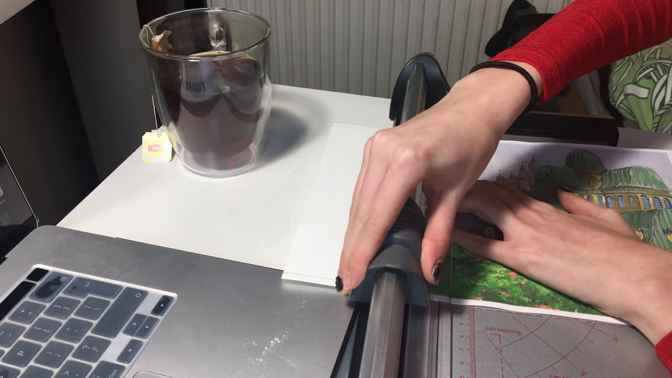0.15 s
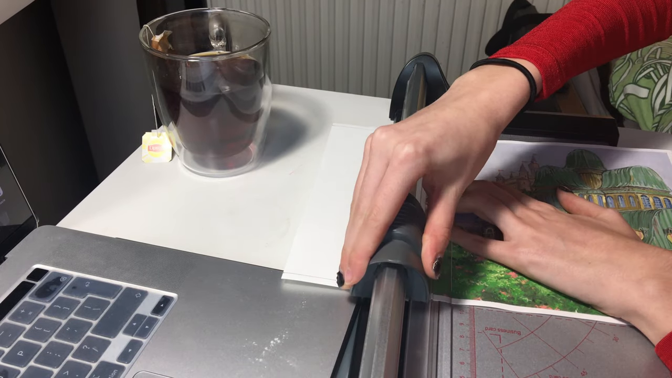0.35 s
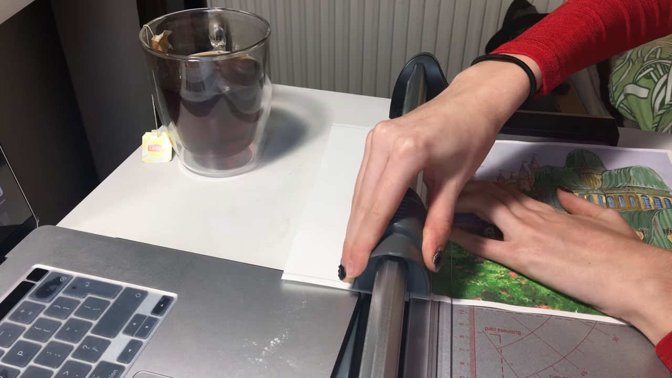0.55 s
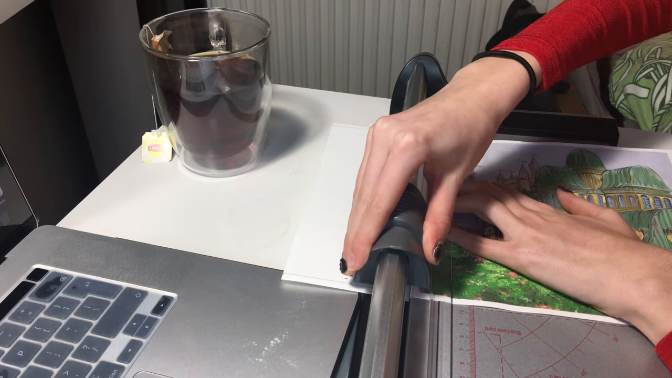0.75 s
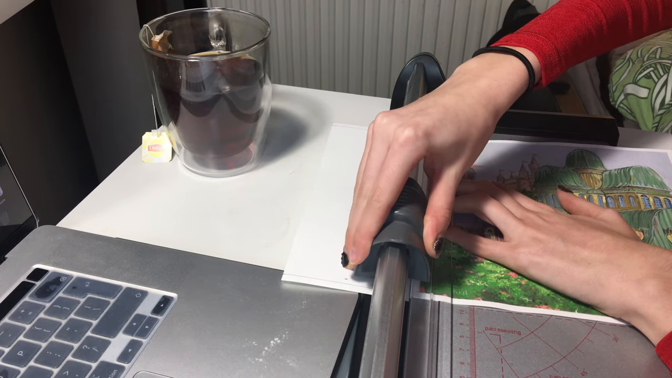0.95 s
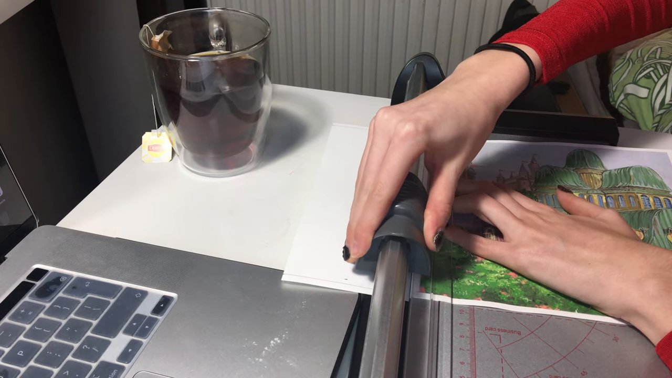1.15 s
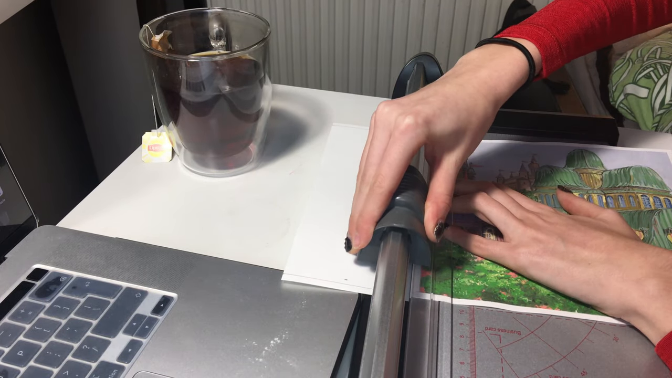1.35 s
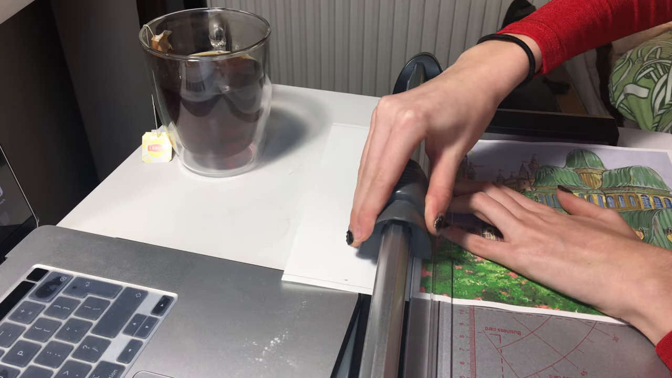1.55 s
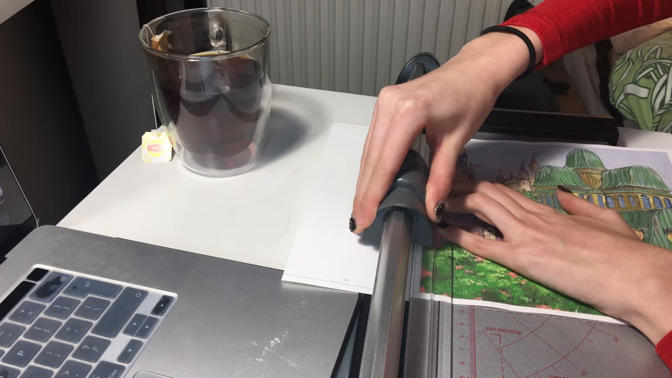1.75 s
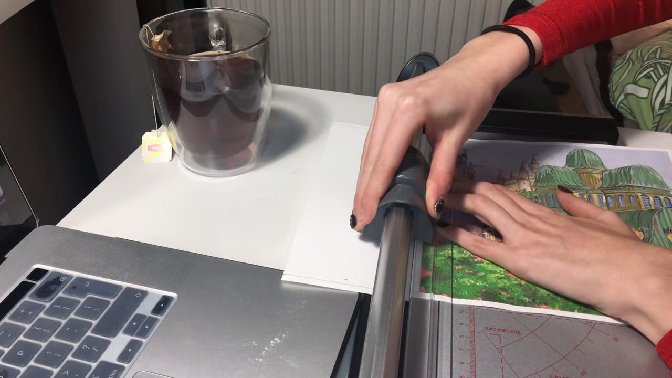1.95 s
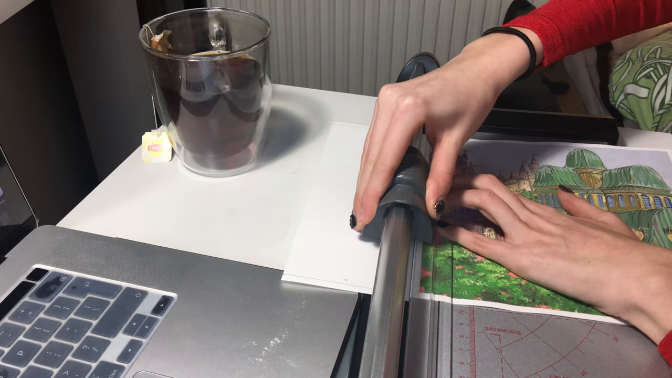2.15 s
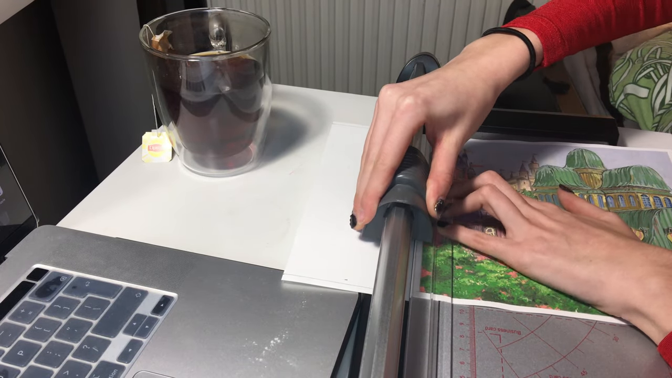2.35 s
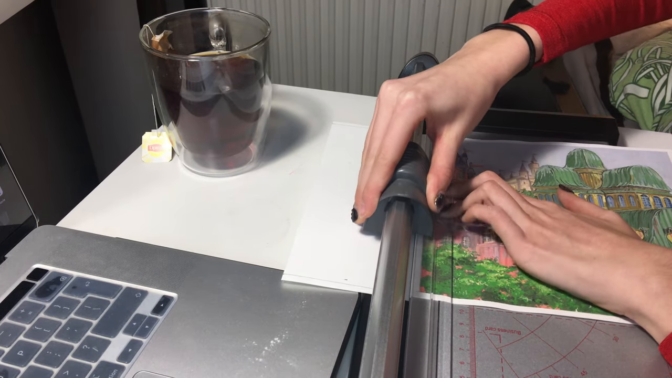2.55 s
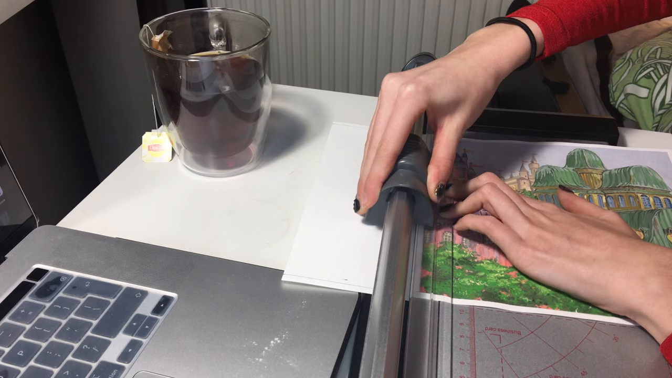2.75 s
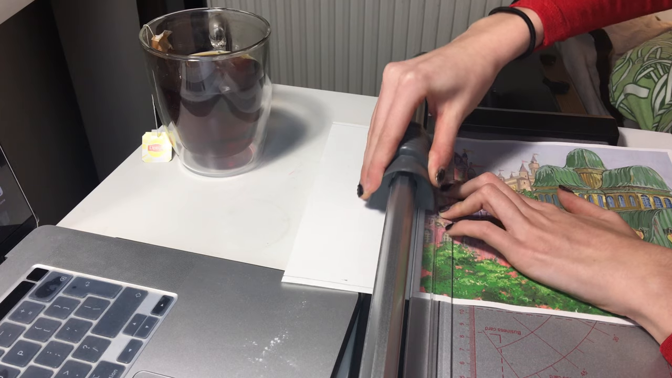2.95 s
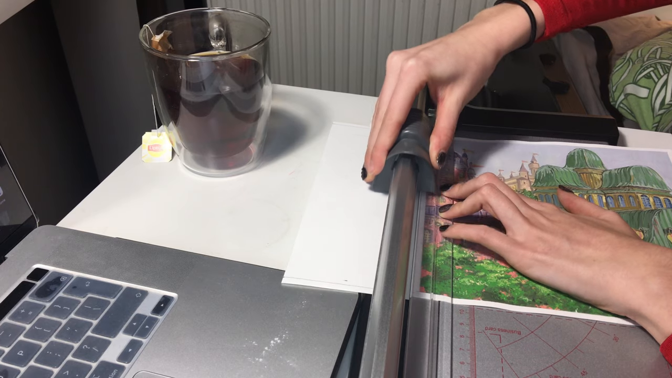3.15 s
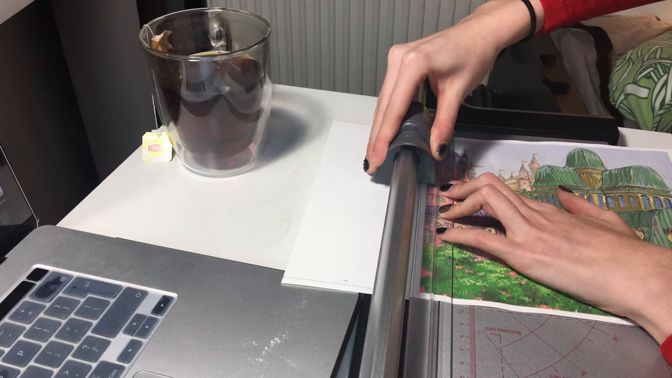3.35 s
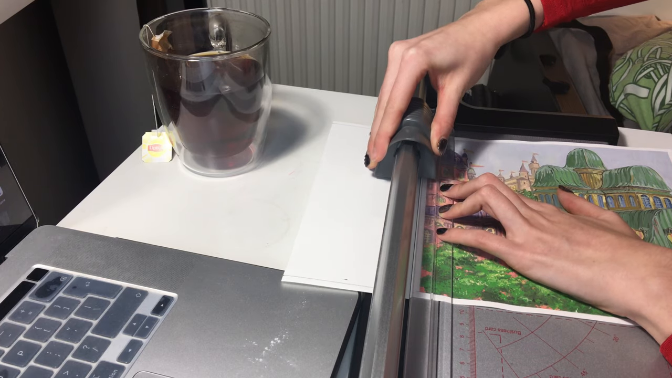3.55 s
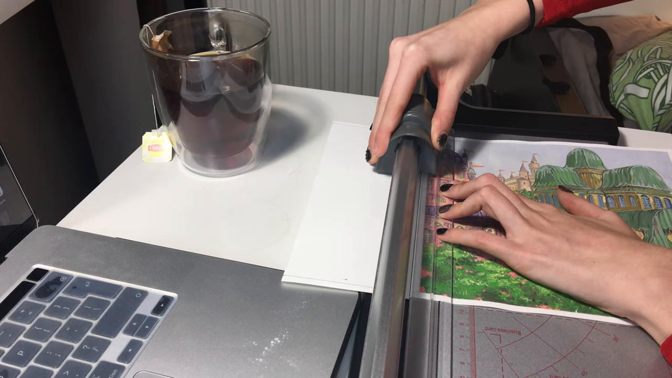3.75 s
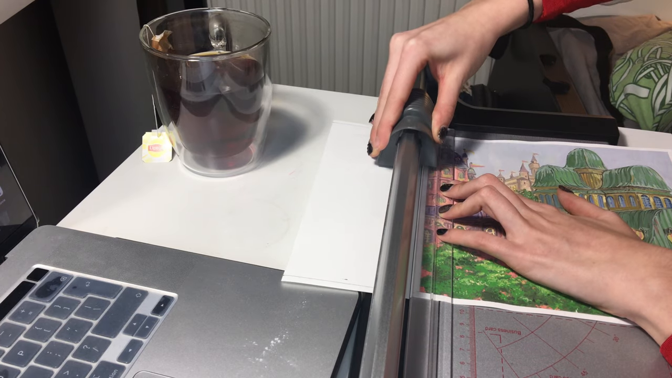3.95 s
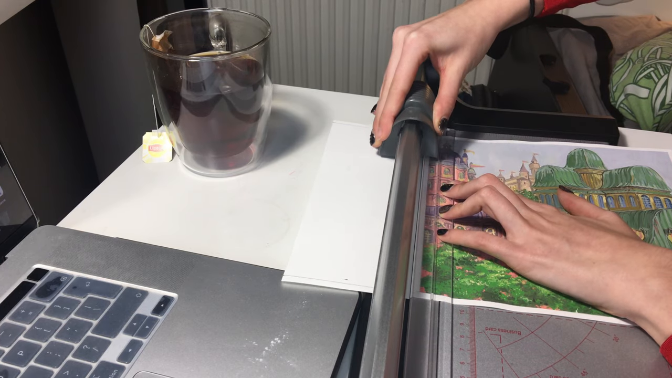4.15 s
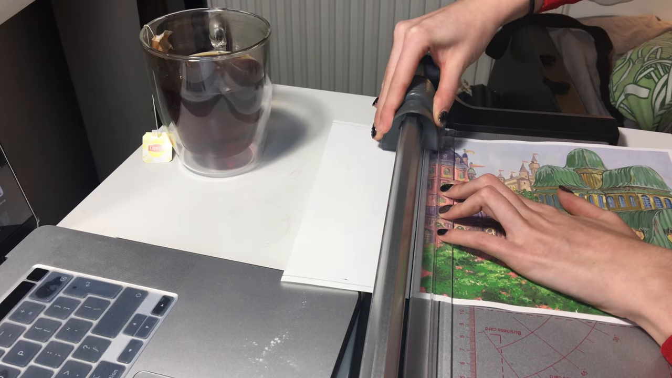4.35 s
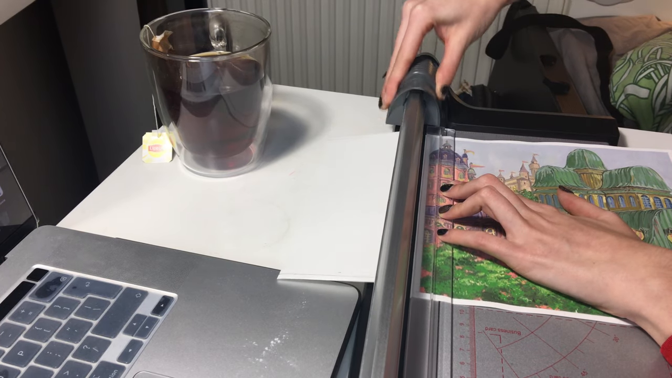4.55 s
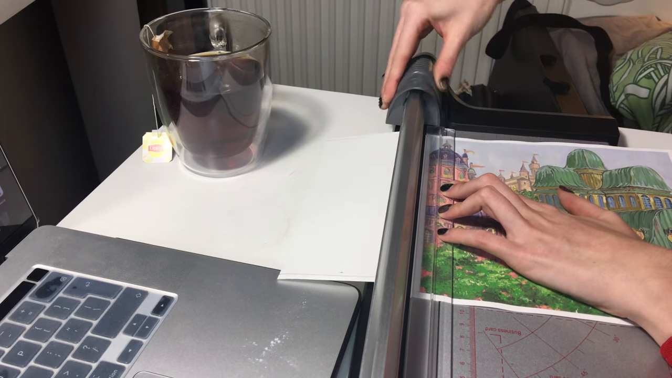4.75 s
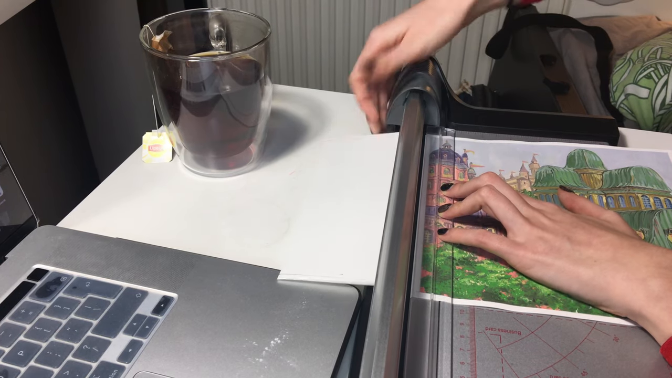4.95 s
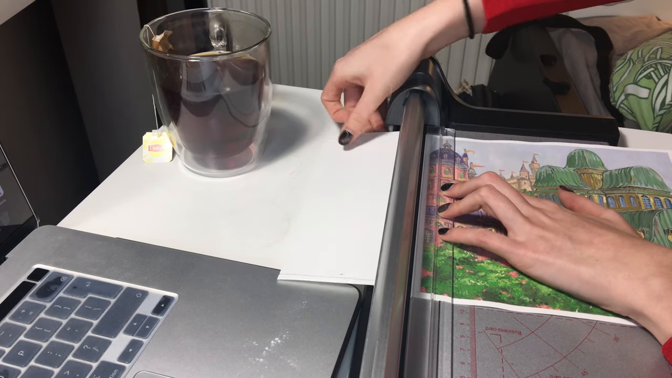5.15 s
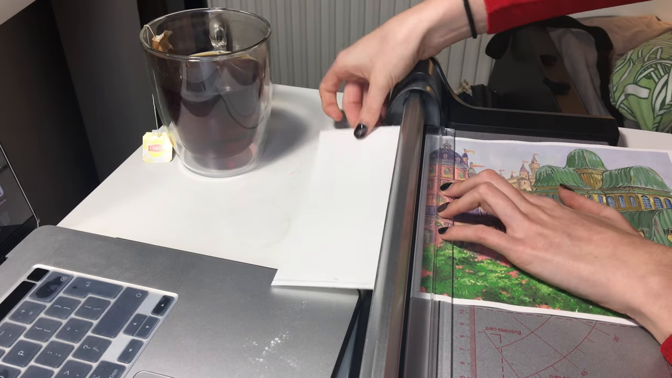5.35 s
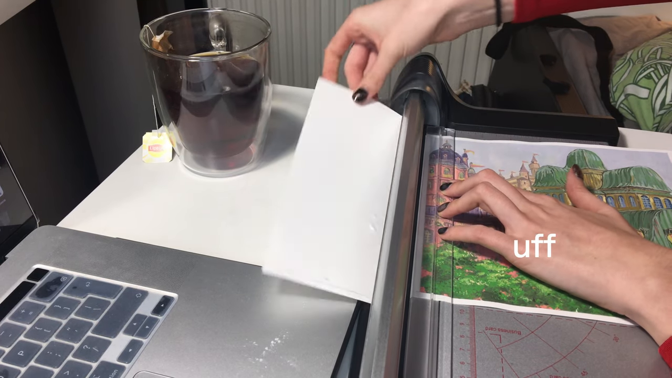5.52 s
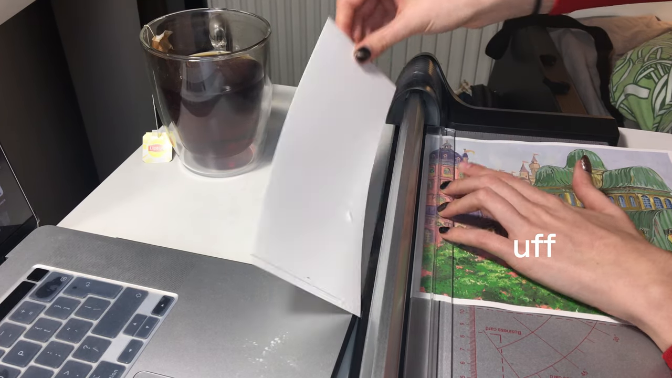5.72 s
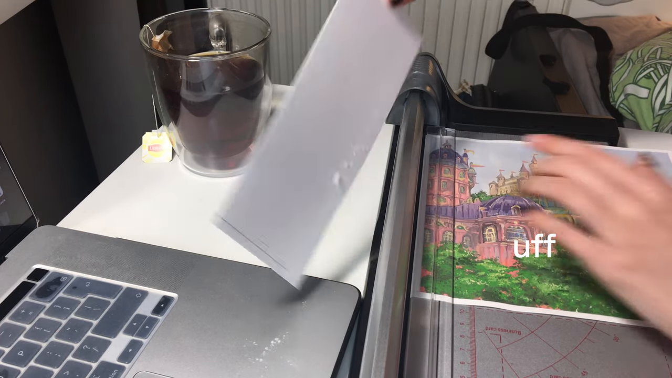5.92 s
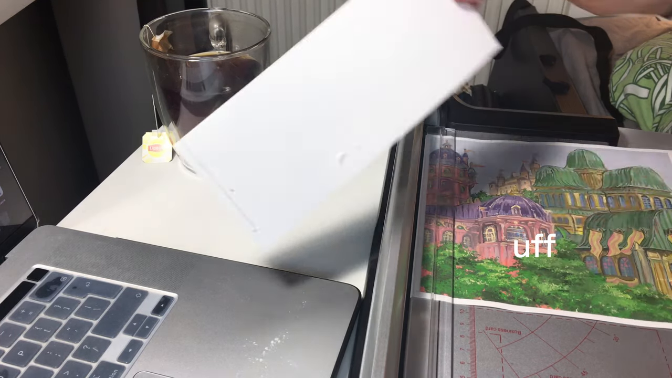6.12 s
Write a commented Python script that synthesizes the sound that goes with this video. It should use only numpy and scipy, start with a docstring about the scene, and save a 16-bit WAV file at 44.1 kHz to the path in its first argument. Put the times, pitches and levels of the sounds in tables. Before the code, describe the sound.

Stick-slip plastic and metal scraping with a fine hiss of cutting paper comes in two strokes of about two seconds, separated by a short gap. The second ends in loud, sharp clacks with a woody thump. Then come quiet finger taps, brief paper rubs and a papery snap with a soft whoosh. Close, dry pickup with short room reflections and faint room air.

```python
"""A desk in a small room: the blade carriage of a rail trimmer is pushed through a sheet of paper in two strokes.
Stick-slip friction and tearing fibres, as random impulses over a hiss, make the rail and its plastic base ring.
The carriage clacks against the end stop: each blow is a burst of contact noise over decaying low modes.
Then fingers let go, slide the cut strip off the desk and lift it, and it snaps free: rubbed noise, a gliding
air resonance and light blows. Still room air lies beneath."""
import sys
import numpy as np
from scipy import signal
from scipy.fft import rfft, irfft
from scipy.io import wavfile

SR = 44100
rng = np.random.default_rng(int(sys.argv[2]) if len(sys.argv) > 2 else 0)


def put_to_file(sound):
    """Save the sound as 16-bit audio at rate SR, in the file named by the first command-line argument."""
    columns = np.atleast_2d(sound).T  # one column per channel
    safe = np.clip(columns, -1, 1)
    whole_steps = np.round(safe * 32767)
    wavfile.write(sys.argv[1], SR, whole_steps.astype(np.int16))


N = 276948
TIME = np.arange(N) / SR  # s
BINS_HZ = np.fft.rfftfreq(16384, 1 / SR)


def amp(db):
    """Level law: decibels to amplitude gain."""
    return 10 ** (np.asarray(db) / 20)


def unit(x):
    """Normalisation: scales a signal to an rms of one."""
    return x / np.sqrt(np.mean(x ** 2) + 1e-20)


def read(points, hz=BINS_HZ):
    """Spectral interpolation: reads a table on a logarithmic frequency axis."""
    f, value = np.transpose(points)
    return np.interp(np.log(hz + 1), np.log(f + 1), value)


def add(mix, s, sound):
    """Superposition: adds a sound to the mix from a given time in s."""
    part = mix[round(s * SR):][:len(sound)]
    part += sound[:len(part)]


def colour(x, db):
    """Minimum-phase filtering: the gain fixes a causal response, so its peaks ring after each impulse."""
    log_gain = np.log(amp(np.r_[db, db[-2:0:-1]]))  # mirrored to negative frequencies
    spectrum = np.exp(np.conj(signal.hilbert(log_gain)))
    response = np.fft.ifft(spectrum).real
    return signal.fftconvolve(x, response[:len(db)])[:len(x)]


def band(x, lo_hz, hi_hz):
    """Band-pass filtering: keeps one frequency band, at an rms of one."""
    hz = np.fft.rfftfreq(len(x), 1 / SR) + 1
    gain = 1 / np.sqrt((1 + (lo_hz / hz) ** 12) * (1 + (hz / hi_hz) ** 12))
    return unit(irfft(rfft(x) * gain, len(x)))


def level(s, db):
    """Level contour: interpolates gain in dB, and is practically silent outside its times."""
    return amp(np.interp(TIME, s, db, left=-140, right=-140))


def gesture(start, length, attack_s, t60):
    """Envelope: a straight rise, a hold to the end of its length, and an exponential decay."""
    t = TIME - start
    return np.clip(t / attack_s, 0, 1) * amp(-60 * np.maximum(t - length, 0) / t60)


def slips(per_s, spread_db, hiss):
    """Stick-slip friction: random impulses of uneven size and either sign over a smooth hiss."""
    size = amp(spread_db * np.minimum(rng.exponential(1, N), 4))
    sign = rng.choice([-1, 1], N)
    slipping = rng.random(N) < per_s / SR
    return unit(unit(size * sign * slipping) + hiss * rng.standard_normal(N))


# spectral shape of the still room air: (f/Hz, relative level/dB per Hz)
AIR_SPECTRUM = [(15, -40.5), (25, -7), (70, 1), (180, -2.5), (354, -8), (463, -11), (2760, -20),
                (4250, -20.5), (4870, -25.5), (6210, -21.5), (10400, -27.5), (13200, -27.5), (16000, -35)]
AIR_DB = -63.5


def room_air():
    """Steady noise: a random signal shaped by the spectrum of still room air."""
    return amp(AIR_DB) * unit(colour(rng.standard_normal(N), read(AIR_SPECTRUM)))


# hands shifting on the base: (start t/s, length t/s, level/dB)
HAND_SHIFTS = [(2.056, 0.23, -63.5), (4.791, .14, -62), (4.99, 0.038, -51), (5.378, 0.13, -62),
               (5.84, 0.077, -65)]
SHIFT_ATTACK_S, SHIFT_T60_S = 0.013, 0.65


def hand_shifts():
    """Friction noise through a resonant body: a dull stir, coloured by the rail's near end."""
    stir = band(colour(rng.standard_normal(N), read(NEAR_COLOUR) + rail_db(0)), 40, 520)
    shifting = sum(amp(db) * gesture(start, length, SHIFT_ATTACK_S, SHIFT_T60_S)
                   for start, length, db in HAND_SHIFTS)
    return stir * shifting


# decay time of the room: (f/Hz, t60/s)
ROOM_DECAY = [(100, 0.064), (500, 0.16), (2000, 0.19), (6000, 0.18), (16000, 0.16)]


def room(x, wet_db=-15, build_s=0.0054):
    """Diffuse reverberation: a tail that builds quickly, dies fastest in the bass and lasts longest around 2 kHz."""
    hz, t, noise = signal.stft(rng.standard_normal(SR // 2), SR, nperseg=256)
    decay = amp(-60 * t / read(ROOM_DECAY, hz)[:, None])
    build = 1 - np.exp(-t / build_s)
    tail = signal.istft(noise * decay * build, SR)[1]
    return x + amp(wet_db) * signal.fftconvolve(x, tail / np.linalg.norm(tail))[:N]


# spectral shape of paper rubbing on the desk: (f/Hz, relative level/dB per Hz)
PAPER_SPECTRUM = [(200, -6), (700, 0.5), (2000, 5), (4000, -8.5), (8000, -7.5), (16000, -14)]
# short slides of the strip over the desk: (start t/s, length t/s, rub level/dB, fizz level/dB)
STRIP_SLIDES = [(5.09, .1, -67, -82), (5.203, 0.024, -54.5, -57), (5.302, 0.054, -72.5, -62),
                (5.458, .03, -62, -73), (5.508, 0.069, -55, -59), (5.595, 0.021, -64, -50),
                (5.663, 0.02, -59, -64)]
SLIDE_ATTACK_S, RUB_T60_S, FIZZ_T60_S = 0.02, 0.39, .16


def strip_slides(catch_db=1.5):
    """Sliding friction: the strip rubs over the desk, and uneven catching modulates the noise."""
    catching = amp(catch_db * band(rng.standard_normal(N), 6.8, 52))
    grain = colour(slips(600, 2.4, 1.0), read(PAPER_SPECTRUM)) * catching
    rub = sum(amp(db) * gesture(start, length, SLIDE_ATTACK_S, RUB_T60_S)
              for start, length, db, _ in STRIP_SLIDES)
    fizz = sum(amp(db) * gesture(start, length, SLIDE_ATTACK_S, FIZZ_T60_S)
               for start, length, _, db in STRIP_SLIDES)
    return band(grain, 430, 5200) * rub + band(grain, 3600, 17000) * fizz


LIFT_S, LIFT_DB, LIFT_ATTACK_S, LIFT_T60_S = 5.683, -51.5, 0.01, 0.33
GAP_SHUT_HZ, GAP_OPEN_HZ, GAP_OPENING_S = 975, 190, 0.022  # the last is a time constant


def strip_lift(pole_width_hz=560):
    """Air-gap resonance: noise under the lifting strip sinks in pitch as the gap opens."""
    opening_s = np.maximum(TIME - LIFT_S - LIFT_ATTACK_S, 0)
    hz = GAP_OPEN_HZ + (GAP_SHUT_HZ - GAP_OPEN_HZ) * np.exp(-opening_s / GAP_OPENING_S)
    carrier = np.exp(2j * np.pi * np.cumsum(hz) / SR)
    r = np.exp(-np.pi * pole_width_hz / SR)  # two equal poles smooth the noise that rides on the carrier
    smooth = signal.lfilter([1], [1, -2 * r, r * r], rng.standard_normal(N))
    air = (carrier * smooth).real
    return amp(LIFT_DB) * unit(air) * gesture(LIFT_S, LIFT_ATTACK_S, LIFT_ATTACK_S, LIFT_T60_S)


def blows(rows, spectrum_db, modes, ring_db, ring_s, swell_s):
    """Impact excitation: a brief chatter of contact with a short ring, and low modes set swinging."""
    out, t = np.zeros(N), np.arange(SR // 2) / SR
    swing = sum(amp(db - 60 * t / t60) * np.sin(2 * np.pi * hz * t) for hz, db, t60 in modes)
    thump = swing * (1 - np.exp(-t / swell_s))
    octaves = np.log2(1 + (BINS_HZ / 1500) ** 2) / 2  # the tilt sets in around 1500 Hz
    for s, crack_db, decay, tilt_db, thump_db in rows:
        envelope = np.exp(-t / decay) + amp(ring_db) * np.exp(-t / ring_s)
        chatter = rng.choice([-1, 1], len(t)) * envelope
        chatter *= 1 - np.exp(-t / .0004)  # the contact takes a moment to close
        crack = colour(chatter, spectrum_db + tilt_db * octaves)
        crack /= np.sqrt(np.mean(crack[:SR // 250] ** 2))  # rms of one over the first 4 ms
        add(out, s, amp(crack_db) * crack + amp(thump_db) * thump)
    return out


# fingers and nails tapping the strip, and the strip snapping:
# (t/s, crack level/dB, contact decay constant t/s, treble tilt/dB per octave, flap level of the sheet/dB)
STRIP_BLOWS = [(5.0165, -41.5, .005, -9, -37), (5.025, -42.5, 0.0067, -29, -47),
               (5.051, -46, .0034, -3, -64), (5.077, -55, 0.0042, 3, -70), (5.139, -62, .003, 5, -56),
               (5.435, -42.5, 0.0016, 13, -48), (5.499, -53, .002, -6, -52), (5.808, -33.5, 0.012, 5, -56),
               (5.811, -37.5, 0.0056, 4, -61), (5.8495, -39, 0.0091, 5, -48.5),
               (5.871, -48.5, 0.014, -15, -45), (5.880, -55, .005, -4.5, -46), (5.910, -58, 0.0034, 1, -55)]
# spectral shape of the cracks on paper: (f/Hz, relative level/dB per Hz)
SNAP_SPECTRUM = [(40, -27), (150, -3), (400, -3), (700, -4), (900, 7), (1600, 9), (2100, 7), (2800, 5),
                 (4000, 5), (6000, -9.5), (9000, -16), (12000, -23), (16000, -36)]
# flexing modes of the strip: (f/Hz, relative level/dB, t60/s)
SHEET_MODES = [(69.4, -1.5, 0.16), (105, -20, 0.3), (155, 2, 0.11), (274, -8, 0.11), (380, -5, 0.059),
               (713, 10.5, 0.016)]


def strip_snaps():
    """Impact on a light sheet: taps and snaps crack, and the strip flexes in its modes."""
    return blows(STRIP_BLOWS, read(SNAP_SPECTRUM), SHEET_MODES, ring_db=-25, ring_s=0.064, swell_s=0.0023)


REBOUND_CRACK_DB, REBOUND_TILT_DB, REBOUND_THUMP_DB = -13, -5.5, -0.5  # relative to the blow; tilt per octave


def with_rebounds(rows):
    """Rebound: each blow is followed by one weaker and duller blow of the loose carriage."""
    out = []
    for s, crack_db, decay, tilt_db, thump_db, after_s in rows:
        out.append((s, crack_db, decay, tilt_db, thump_db))
        out.append((s + after_s, crack_db + REBOUND_CRACK_DB, decay,
                    tilt_db + REBOUND_TILT_DB, thump_db + REBOUND_THUMP_DB))
    return out


# blows on the trimmer: (t/s, crack level/dB, contact decay constant t/s, treble tilt/dB per octave,
# thump level of the base/dB, delay of the rebound t/s)
TRIMMER_BLOWS = [(2.044, -58, 0.0027, 0, -82, .03), (2.116, -55, 0.0055, -10, -69, .012),
                 (2.1793, -39, .0036, -2, -52, .012), (2.272, -53.5, 0.019, -59, -60, .012),
                 (4.4545, -21, 0.0018, 1.5, -38, .0065), (4.4833, -9, 0.0043, -2.5, -21, 0.0047),
                 (4.5482, -19.5, .0041, -1, -35, .006), (4.572, -12, 0.0019, 0.5, -31.5, .012),
                 (4.657, -36, .0054, -11, -48, .019), (4.7858, -49, .003, -2.5, -55, .012),
                 (4.8155, -59, 0.0095, -29, -44.5, .0125), (4.897, -60.5, 0.0033, -2, -58, .018),
                 (4.984, -53, .004, 0, -64, 0.0087), (4.9888, -38, 0.011, 3, -55, .008)]
# spectral shape of the cracks, before the rail's resonances: (f/Hz, relative level/dB per Hz)
CRACK_SPECTRUM = [(40, -35), (150, -20.5), (400, -23.5), (700, -7), (1200, 2), (1700, 5), (2200, 2.5),
                  (2900, 1.5), (4000, -2.5), (6000, -6), (8000, -9), (12000, -18.5), (16000, -19.5)]
# modes of the base thumping on the desk: (f/Hz, relative level/dB, t60/s)
BASE_MODES = [(66.6, -17, 0.5), (120, -8.5, 0.17), (159, 3, 0.15), (210, 5.5, 0.08), (247, -5, 0.18),
              (325, -26.5, 0.063), (665, -15, 0.096), (1394, -17.5, 0.085), (1771, -22, 0.12)]


def trimmer_knocks():
    """Impact on a resonant body: blows ring the far part of the rail and thump the base."""
    spectrum_db = read(CRACK_SPECTRUM) + 0.51 * rail_db(0.91)
    return blows(with_rebounds(TRIMMER_BLOWS), spectrum_db, BASE_MODES,
                 ring_db=-23.0, ring_s=.014, swell_s=0.0015)


# resonances of rail and base:
# (f/Hz, width f/Hz, lift level/dB, extra lift at the antinode level/dB, antinode place along the rail 0-1)
RAIL_MODES = [(170.2, 14.3, 18.5, 2.5, 0.3), (208.8, 20, 5.5, 9.5, 0.89), (316, 52, 6.5, 2.5, 0.4),
              (460, 8.2, -1, 8, .3), (649.4, 40, 15.5, 7.5, 0.17), (855, 21, 14, 12, 0.73),
              (898, 78, 8.5, 9.5, 0.8), (883, 83, 5.5, 11, 0), (1238, 52, 9, 2, .3),
              (1390, 51, 10.5, 6, 0.26), (1455, 120, 7.5, 5.5, 0.5), (1546, 60, 6, 6, 1),
              (1726, 43, -2.5, 20, 0.99), (1920, 99, -10.5, 13.5, 0.1), (2070, 120, 2.5, 10, 0.23),
              (2210, 110, 10, 2.5, 0.6), (2300, 52, 4, 11, 0.1), (2596, 45, -5.5, 1.5, .5),
              (2850, 61, 2.5, 12, 0.31), (3094, 39, 2, 11.5, 1), (3340, 530, 1, 9, 0.67),
              (3740, 100, -3, 13.5, 0.22), (4510, 110, -2.5, 12, .3), (5210, 150, 2.5, 4.5, .25),
              (5485, 200, 5, 3.5, .45), (6030, 180, 2, 6.5, 0.4), (6470, 180, 1.5, -3.5, 0.4),
              (8790, 230, 0, 10.5, 0.2), (9580, 270, 3.5, 4.5, .85), (11480, 540, 6.5, 3.5, 0.7)]


def rail_db(place, reach=0.19):
    """Modal coupling: the lift of each resonance depends on how near the carriage is to its antinode."""
    power = 1
    for hz, width, lift_db, extra_db, antinode in RAIL_MODES:
        nearness = np.exp(-((place - antinode) / reach) ** 2)
        peak = amp(abs(lift_db + extra_db * nearness))  # always a peak, never a dip
        power = power + (peak ** 2 - 1) / (1 + (2 * (BINS_HZ - hz) / width) ** 2) ** 1.5
    return 10 * np.log10(power)


def shell(x, ring_db=-4, t60=0.084):
    """High modal density: many weak modes of rail and housing add a short dense ring."""
    t = np.arange(SR // 5) / SR
    ring = band(rng.standard_normal(len(t)), 1500, 17000) * amp(-60 * t / t60)
    return x + amp(ring_db) * signal.oaconvolve(x, ring / np.linalg.norm(ring))[:len(x)]


# friction colour with the carriage at the near part of the rail: (f/Hz, relative level/dB per Hz)
NEAR_COLOUR = [(25, -33), (65, -4.5), (120, -13.5), (240, -5), (400, -10.5), (520, -13), (760, -24.5),
               (1000, -4.5), (2200, -12.5), (2600, -11.5), (4800, -18.5), (6500, -20.5), (9000, -21.5),
               (10500, -27.5), (15500, -32)]
# the same at the far part: (f/Hz, relative level/dB per Hz)
FAR_COLOUR = [(25, -34.5), (65, -6.5), (120, -9), (245, -4.5), (400, -10), (520, -16), (760, -13),
              (1100, -9), (1800, -9.5), (2600, -8.5), (4000, -17), (4800, -18), (5800, -15.5),
              (8000, -23.5), (10500, -26.5), (15500, -28.5)]
# how far the carriage has come: (t/s, share of the rail 0-1)
CARRIAGE_TRAVEL = [(0, 0.09), (1.9, 0.41), (2.45, 0.34), (3.2, 0.7), (4.48, 0.98)]


def rail(drive, count=9):
    """Moving excitation: friction enters the rail where the carriage is, so its colour drifts."""
    travel, out = np.interp(TIME, *np.transpose(CARRIAGE_TRAVEL)), np.zeros(N)
    for place in np.linspace(0, 1, count):
        nearness = np.maximum(1 - abs(travel - place) * (count - 1), 0)  # cross-fade between places
        friction_db = (1 - place) * read(NEAR_COLOUR) + place * read(FAR_COLOUR)
        out += shell(colour(drive * nearness, friction_db + rail_db(place)))
    return out


# the two pushes of the carriage, one list each: (t/s, effort level/dB)
CARRIAGE_PUSHES = [
    [(0.0, -35.5), (0.324, -46.5), (0.434, -39.5), (0.578, -43), (0.59, -42), (0.612, -51), (0.634, -42),
     (0.838, -39), (0.892, -45), (1.03, -39), (1.13, -44.5), (1.318, -39.5), (1.394, -35), (1.45, -44),
     (1.704, -33.5), (1.836, -37), (1.908, -51.5), (1.98, -93)],
    [(2.42, -95), (2.45, -51.5), (2.54, -36.5), (2.63, -33), (2.7, -38), (2.89, -36.5), (2.94, -32.5),
     (3.12, -33), (3.28, -37), (3.37, -36), (3.5, -45), (3.6, -37), (3.83, -44), (3.86, -37), (4.11, -33),
     (4.25, -38.5), (4.44, -32), (4.45, -38)],
]
# the carriage rocking against the end stop: (start t/s, length t/s, effort level/dB)
STOP_ROCKS = [(4.436, .085, -35), (4.552, 0.018, -32.5)]
USUAL_EFFORT_DB, ROCK_ATTACK_S = -38, 0.009


def effort(settle_t60):
    """Driving force: the stronger of pushing and rocking at the stop, in dB over the usual effort."""
    pushing = sum(level(*np.transpose(push)) for push in CARRIAGE_PUSHES)
    rocking = sum(amp(db) * gesture(start, length, ROCK_ATTACK_S, settle_t60)
                  for start, length, db in STOP_ROCKS)
    return 20 * np.log10(np.maximum(pushing, rocking)) - USUAL_EFFORT_DB


# layers of the friction, from the base, the slider and the blade, then the highest treble:
# (low edge f/Hz, high edge f/Hz, level at the usual effort/dB, growth/dB per dB of effort)
BASE_RUMBLE = (18, 482, -39.5, 0.65)
SLIDER_SCRAPE = (542, 2490, -38.5, 0.93)
BLADE_CUT = (3502, 7402.5, -44.5, 1.05)
TREBLE_FIZZ = (7999.5, 27000, -53.5, 0.94)
# brisk stretches where the blade bites: (middle t/s, half length t/s, lift of the fizz level/dB)
BLADE_BITES = [(1.7, 0.15, 2.5), (3.083, 0.17, 4)]
ROCK_T60_S, BASE_SHUDDER_T60_S = .17, 0.23
BASE_LAG_S = 0.028  # the heavy base builds up and dies away later than the slider


def carriage(judder_db=1.22, cut_bite=0.44):
    """Common excitation: the same juddering slips drive base, slider and blade, each with its own growth."""
    judder = amp(judder_db * band(rng.standard_normal(N), 36, 71))
    body = rail(slips(2500, 3.25, 0.81) * judder)

    def driven(layer, effort_db):
        """Level growth: one band of the friction at the level that the effort gives it."""
        lo_hz, hi_hz, usual_db, growth = layer
        return band(body, lo_hz, hi_hz) * amp(usual_db + growth * effort_db)

    sliding_db = effort(ROCK_T60_S)
    base_db = np.interp(TIME - BASE_LAG_S, TIME, effort(BASE_SHUDDER_T60_S))
    bite_db = sum(db * np.exp(-((TIME - middle) / half) ** 2) for middle, half, db in BLADE_BITES)
    return (driven(BASE_RUMBLE, base_db)
            + driven(SLIDER_SCRAPE, sliding_db)
            + driven(BLADE_CUT, sliding_db) * amp(cut_bite * bite_db)  # the cut takes part of the lift
            + driven(TREBLE_FIZZ, sliding_db) * amp(bite_db))


def scene():
    """Superposition: strokes, knocks and paper share one room, over the background."""
    on_desk = carriage() + trimmer_knocks() + strip_snaps() + strip_slides() + strip_lift()
    return (room(on_desk) + hand_shifts() + room_air())[None]


def record(dry, low_cut_hz=42, edge_hz=15900, ceiling=.85):
    """Transduction: the microphone's bass roll-off, a soft saturation of large peaks, and a band limit."""
    bass_cut = signal.butter(2, low_cut_hz, "highpass", fs=SR, output="sos")
    thinned = signal.sosfilt(bass_cut, dry)
    rounded = ceiling * np.tanh(thinned / ceiling)
    band_limit = signal.firwin(511, edge_hz, window=("kaiser", 9), fs=SR)
    return signal.oaconvolve(rounded, band_limit[None], "same")


dry = scene()
out = record(dry)
put_to_file(out)
```